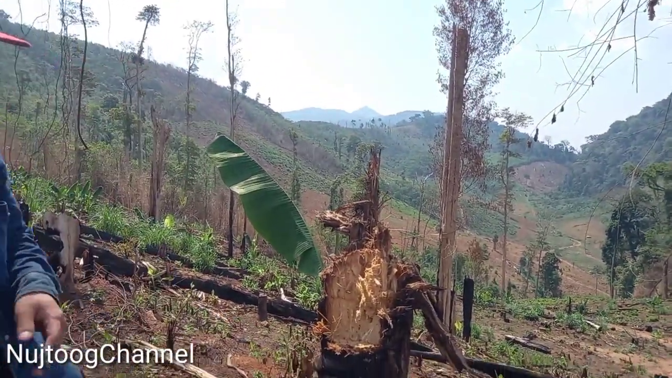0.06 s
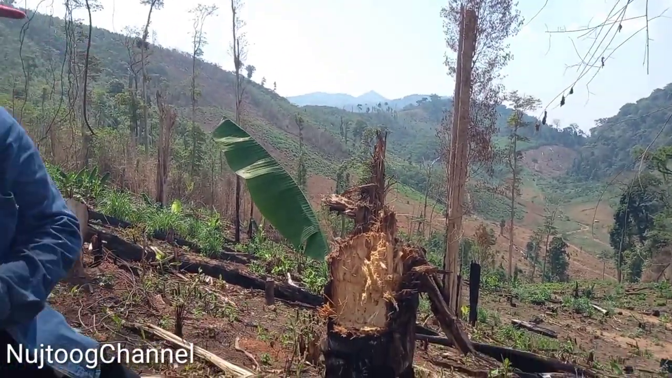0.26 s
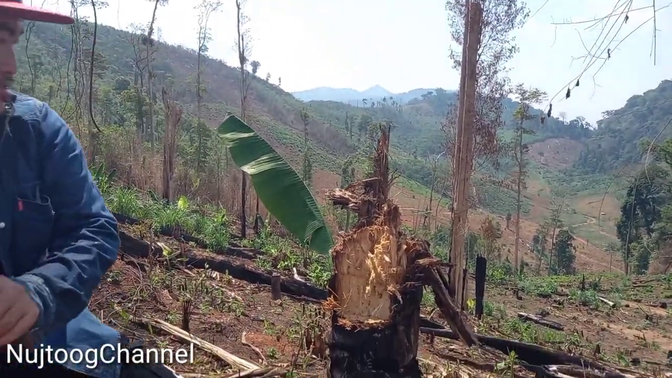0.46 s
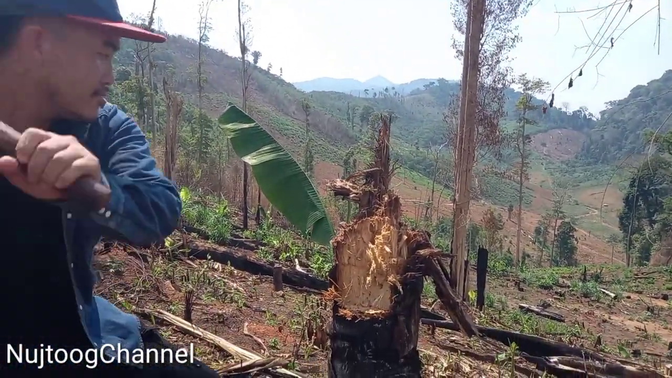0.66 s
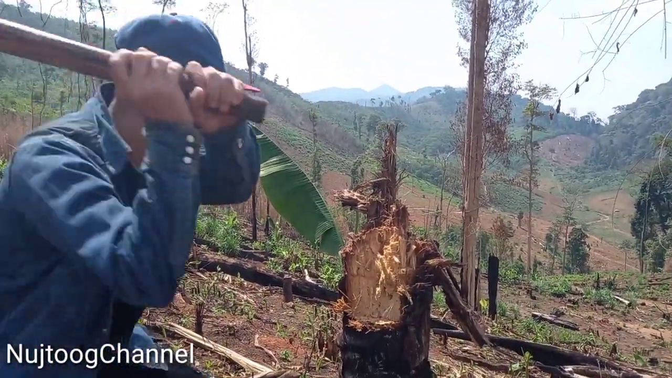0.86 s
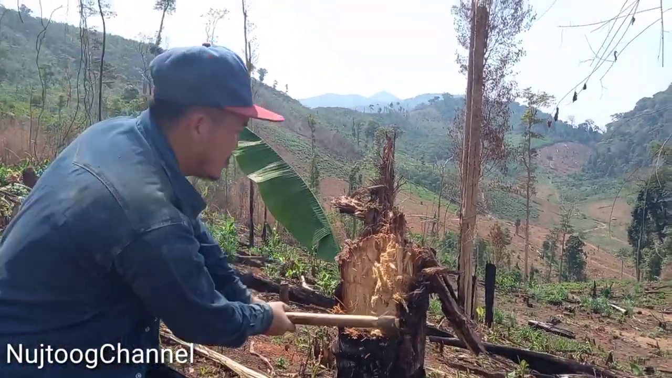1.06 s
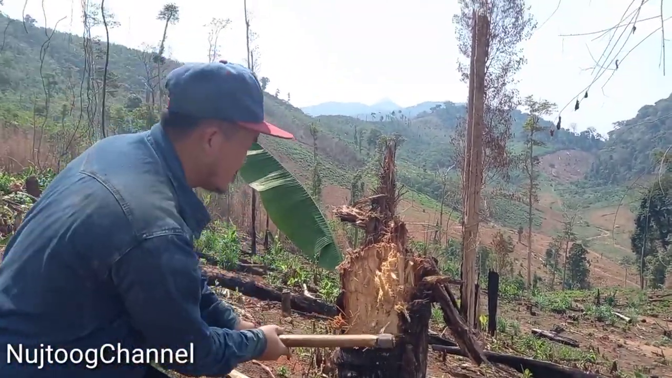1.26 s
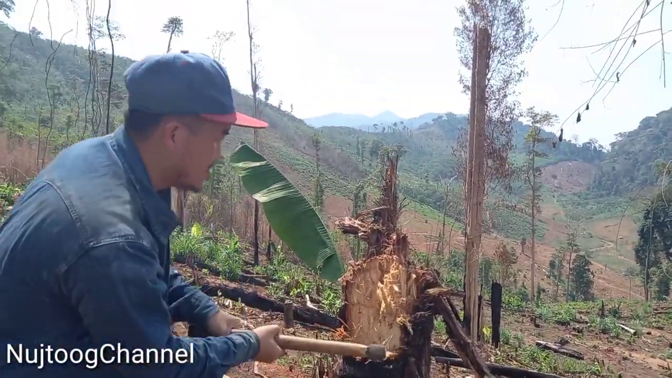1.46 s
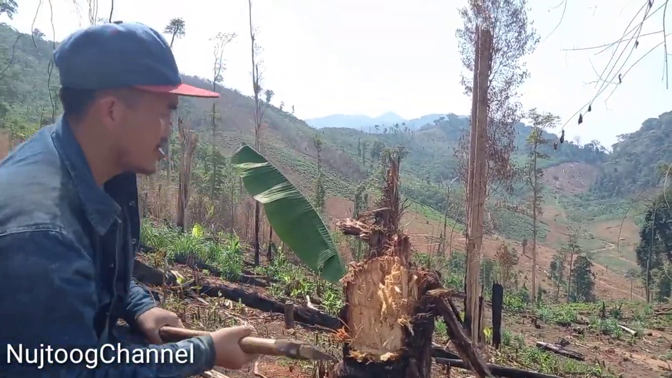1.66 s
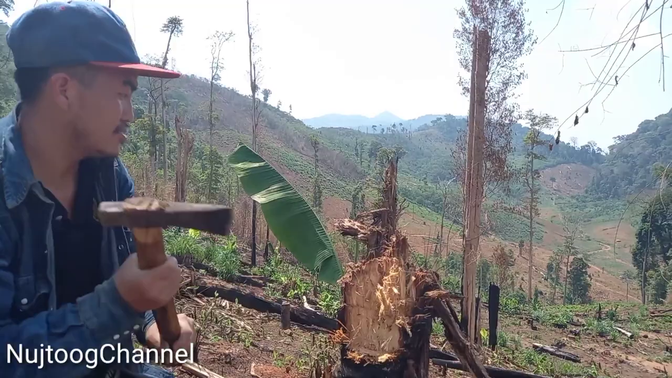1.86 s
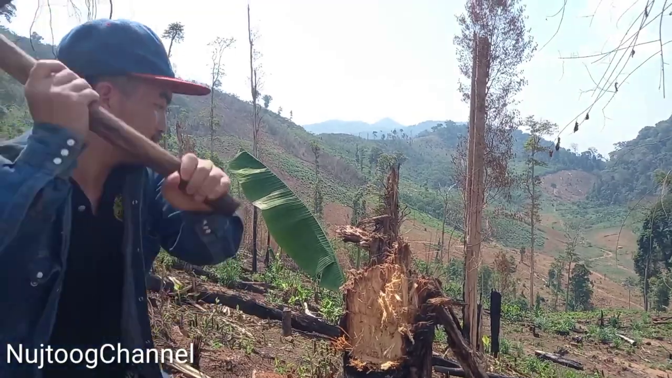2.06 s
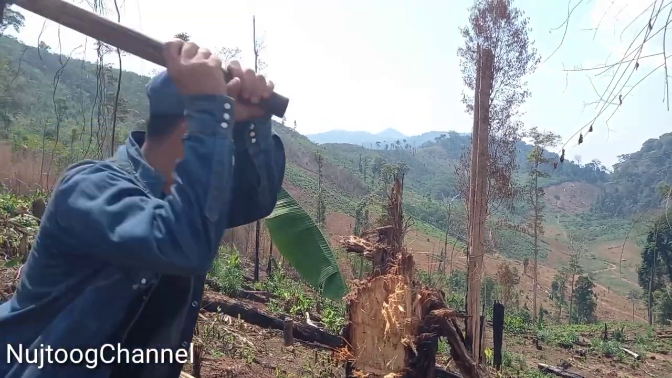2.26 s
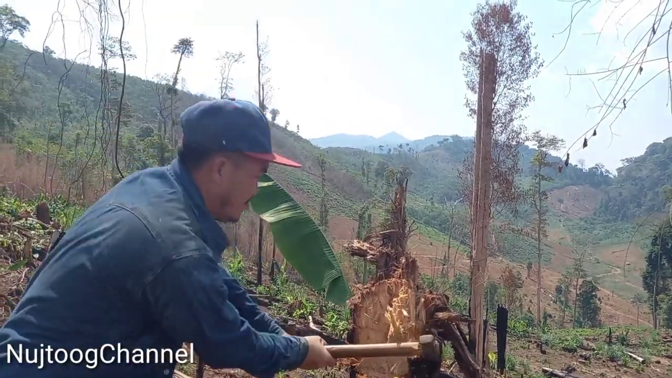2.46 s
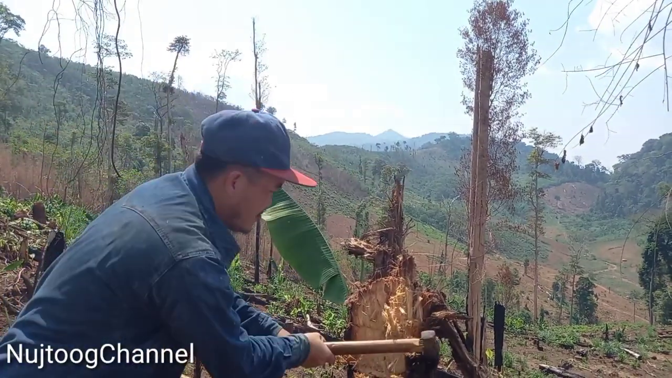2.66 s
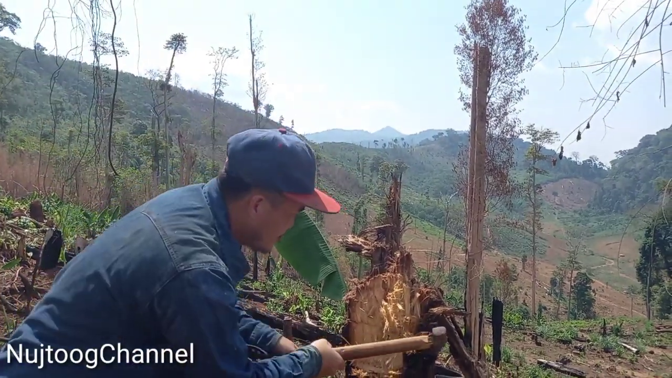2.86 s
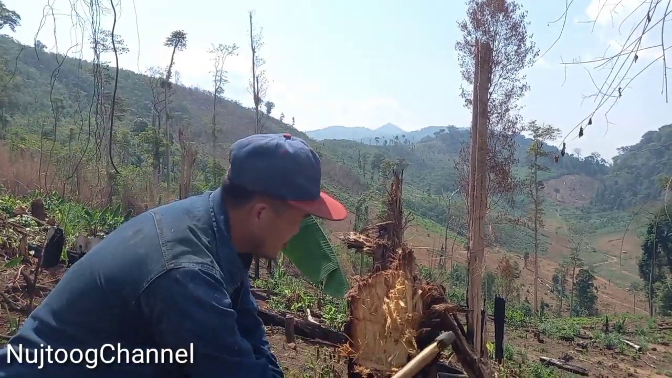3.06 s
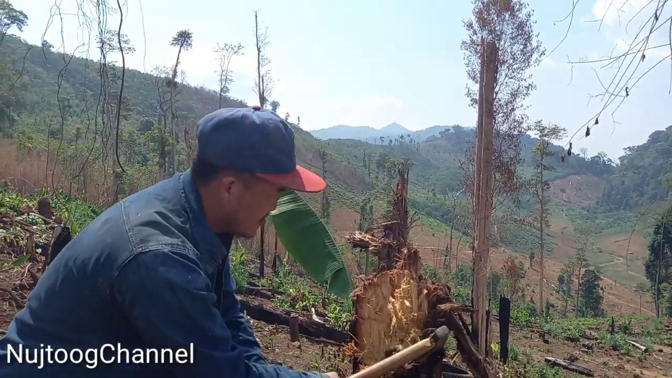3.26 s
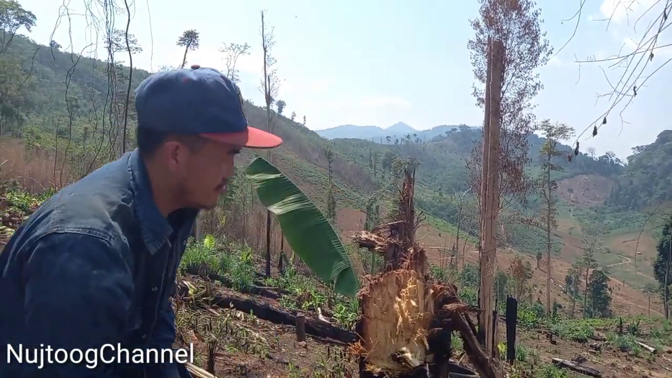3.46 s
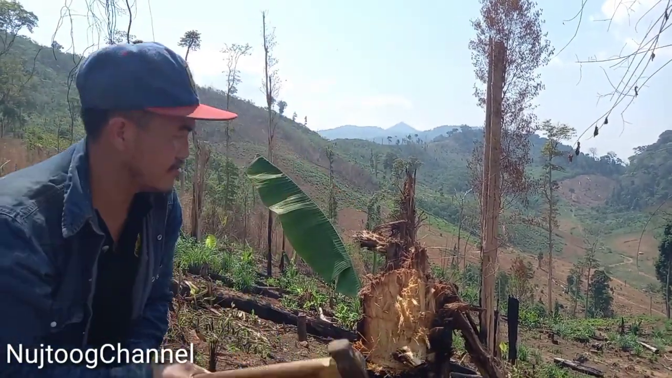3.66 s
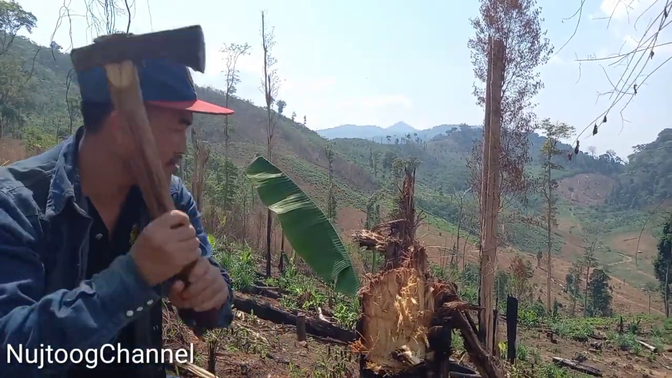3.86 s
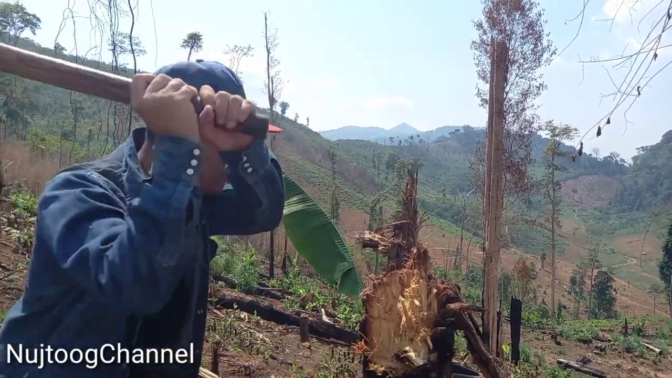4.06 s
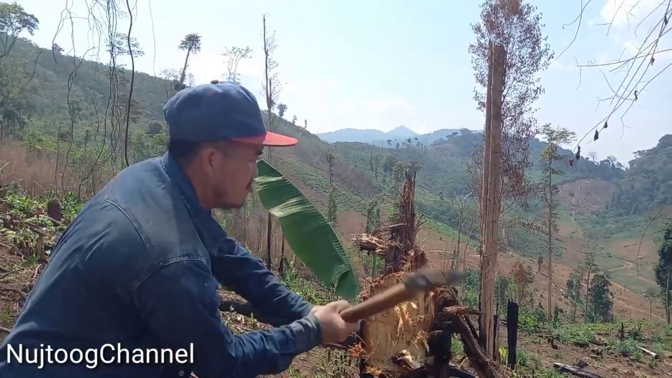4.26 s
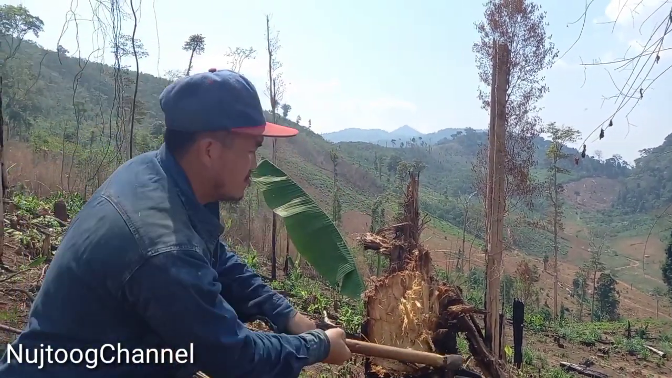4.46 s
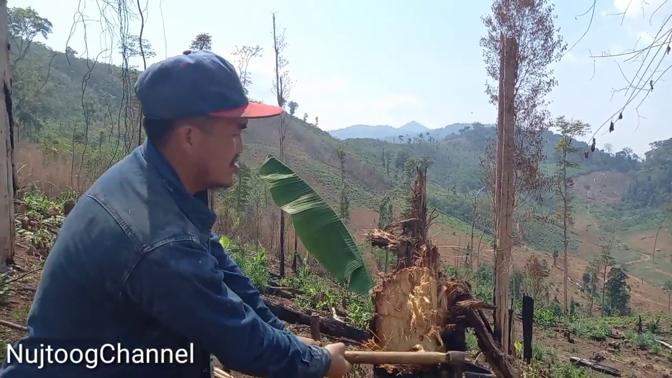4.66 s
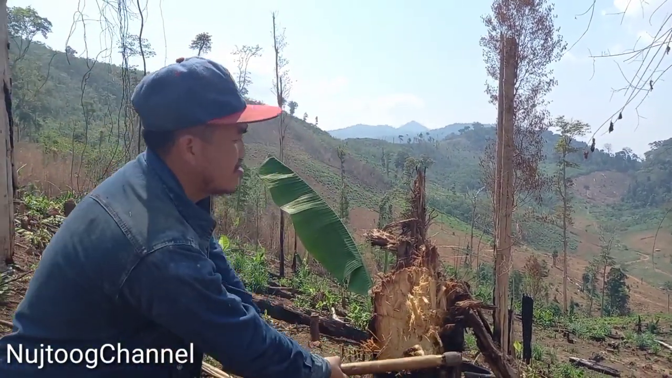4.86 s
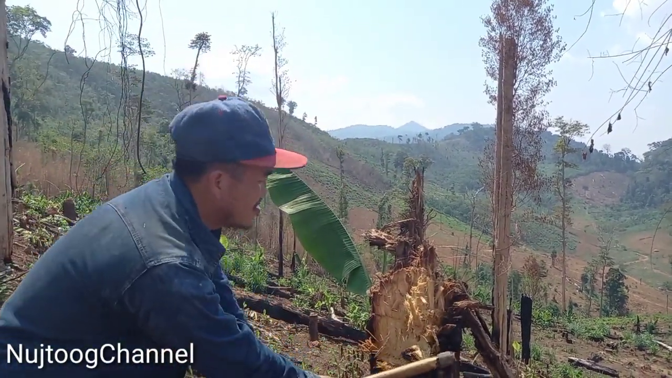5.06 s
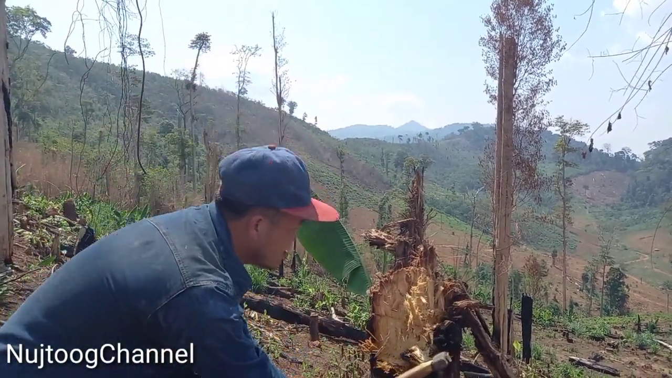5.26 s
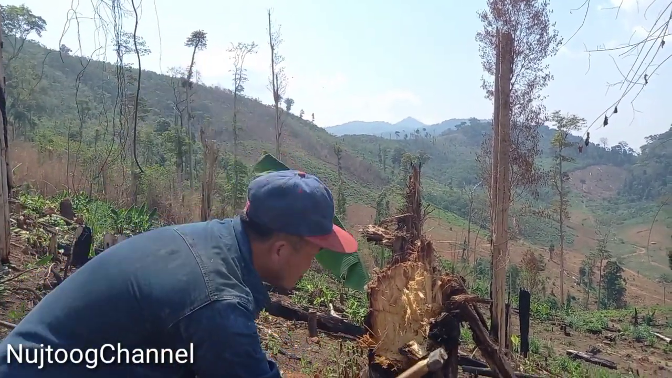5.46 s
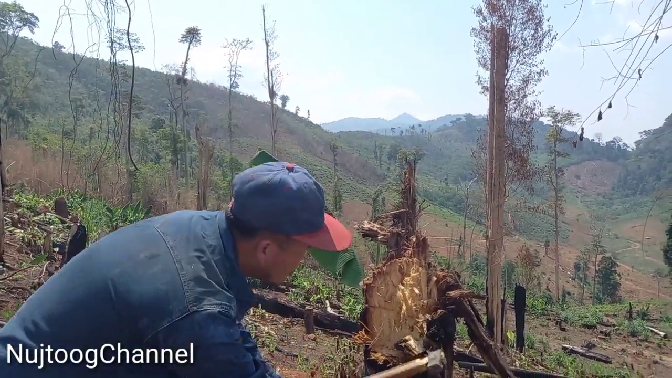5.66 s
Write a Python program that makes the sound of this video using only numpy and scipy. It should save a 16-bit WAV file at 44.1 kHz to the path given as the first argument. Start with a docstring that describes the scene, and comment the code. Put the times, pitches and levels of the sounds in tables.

```python
"""An open hillside: three heavy axe blows into a dead stump, close to a two-port microphone.
Each blow is a burst of crushed fibres shaped by slab resonances, then damped knock and thud modes and noisy crumbs.
Short bursts make splinters, chips, leaf ticks and one bird-like tick; late slips, sent as bending waves, creak.
Filtered noise makes low air, hissing insects, a cicada's phrases and scuffs; falling sine chips make small birds."""
import sys
import numpy as np
from scipy import signal
from scipy.fft import rfft, irfft
from scipy.io import wavfile
from scipy.ndimage import uniform_filter1d

SR = 44100
rng = np.random.default_rng(int(sys.argv[2]) if len(sys.argv) > 2 else 0)


def log_audio(samples):
    """Write samples as a 16-bit WAV file to the path given in sys.argv[1]."""
    # one column per channel
    frames = np.atleast_2d(samples).T
    # limit to full scale, then quantise
    limited = np.clip(frames, -1, 1)
    pcm = np.round(limited * 32767).astype(np.int16)
    wavfile.write(sys.argv[1], SR, pcm)


N = 252252
TIME = np.arange(N) / SR

# Colour of the wind and far rumble. Each row: frequency in Hz, relative level in dB.
AIR_COLOUR = [(15, -57), (25, -28), (63, -5), (80, 3), (118, -5.5), (173, -14.5), (276, -14), (583, -21.5),
              (840, -18), (1230, -27), (1600, -25), (2080, -45), (3520, -120)]
AIR_DB = -70.5
# Colour of the insect chorus. Each row: frequency in Hz, relative level in dB.
HISS_COLOUR = [(1100, -32), (1750, -16.5), (2200, -14.5), (2800, -9), (3450, -1.5), (4100, -6.5),
               (4800, -3), (5500, -8), (6700, -7), (7500, -13.5), (9700, -14), (10600, -19.5), (13000, -22),
               (15200, -31), (16000, -42.5)]
# Narrow bands in the chorus. Each row: centre in Hz, half-width in Hz, relative level in dB.
HISS_BANDS = [(1695, 25, -7.5), (3420, 230, -3)]
# Swell of the chorus. Each row: time in seconds, level in dB before its patches and side lean.
HISS_LEVEL = [(0, -59), (2.6, -59.5), (4.1, -61.5), (5.7, -60)]
# Swell of a far insect's buzz. Each row: time in seconds, level in dB.
INSECT_LEVEL = [(0, -81.5), (3.2, -73.5), (3.7, -75.5), (4.6, -74.5), (4.85, -76), (5.72, -69.5)]
# Likeness of near sounds at the two ports. Each row: frequency in Hz, likeness from -1 to 1.
NEAR_LIKENESS = [(100, 0.88), (1000, 0.92), (2000, 1), (4000, 0.85), (7000, 1), (15000, 0.48)]
# Likeness of the air, chorus and cicada at the two ports. Each row: frequency in Hz, likeness from -1 to 1.
AIR_LIKENESS = [(80, 0.1), (900, 0.4), (2200, 0.1), (3500, -0.5), (4700, 0.1), (6000, -0.2), (9000, 0.1)]
# Likeness of crumbs and scattered sound at the two ports. Each row: frequency in Hz, likeness from -1 to 1.
SCATTER_LIKENESS = [(100, 0.95), (500, 0.63), (1000, 0.6), (2000, 0.94), (4000, .1), (15000, 0.11)]
# Near sounds lag at the left port. Each row: frequency in Hz, lag in radians.
PORT_LAG = [(100, 0), (1400, 0.63), (2400, 1.81), (3500, 1.06), (6000, 2), (9000, 1.5), (15000, 3.5)]
# Near bursts are shaded at the left port. Each row: frequency in Hz, left over right in dB.
PORT_SHADE = [(100, -1), (400, -0.94), (2000, 0), (4500, 0), (7200, -2.5), (9000, -1.5), (13000, -2)]

# Double chips of the nearer bird. Each row: time of the first chip in seconds, mean envelope in dB, mid pitch in Hz.
NEAR_CHIPS = [(2.24, -58, 5800), (3.605, -61, 6100)]
CHIP_GAP_S = .0385
# Brief single chips from further off; the spreads reach as far up as down.
FAR_CHIP_DB, FAR_CHIP_SPREAD_DB, FAR_CHIP_HZ, FAR_CHIP_SPREAD_HZ = -65.5, 4, 6310, 520
FAR_CHIPS_PER_S, FAR_CHIP_S = 36, .006
# Scuffs of feet and sleeves. Each row: middle in seconds, peak level in dB, Gaussian length in seconds, centre in Hz.
SCUFFS = [(.06, -58.5, 0.0087, 1530), (0.596, -68, 0.058, 880), (1.632, -74, 0.052, 835),
          (1.77, -64.5, .035, 1400), (2.821, -61.5, 0.018, 1010), (2.991, -58.5, 0.009, 2780),
          (3.079, -56.5, 0.025, 1700), (3.298, -62, 0.022, 2080), (3.53, -69, 0.055, 940)]

# Splinters snapping, chips landing, and one faint bird-like tick at 1.7255 s.
# Each row: time in seconds, level in dB, length in seconds, brightness in dB per octave, ring in Hz.
SNAPS_AND_TICK = [(1.189, -42, 0.0009, 4, 5070), (1.7255, -51.5, 0.0005, 3, 5800),
                  (2.788, -44, 0.00082, 1.5, 4650), (2.808, -39.5, .0009, 2, 4900),
                  (2.8565, -37, 0.00042, 1, 1900), (2.86, -41.5, 0.0057, -1, 1760),
                  (3.0488, -36.5, 0.0014, 0, 1650), (3.599, -48, 0.00044, 4, 6330)]
# Shared colour of all these short bursts. Each row: frequency in Hz, relative level in dB.
SNAP_COLOUR = [(200, -17), (900, -10), (1700, -2), (3000, 2.5), (5500, 1.5), (7000, 1), (8000, -8),
               (12500, -5.5), (16000, -13)]
SNAP_RING_DB, SNAP_RING_WIDTH_HZ = 9, 300  # each burst's own resonance
# Fibres tear in a quick run as the blade is levered out.
TEAR_START_S, TEAR_GAP_S, TEAR_LENGTH_S, TEAR_HZ = 2.8165, .013, .0013, 5200
TEAR_DB, TEAR_FADE_DB_PER_S = -43, 150
# Small chips land after each blow, the later the fainter; the tilt is per octave.
DEBRIS_FROM_S, DEBRIS_TO_S, DEBRIS_TILT_DB, DEBRIS_HZ = .06, 0.22, 8, 6030
DEBRIS_DB, DEBRIS_FADE_DB_PER_S = -45.5, 70
# Dry leaves and twigs underfoot: the faintest tick, the range above it, and the tilt per octave.
FAINTEST_TICK_DB, TICK_RANGE_DB, TICK_TILT_DB, TICKS_PER_S = -66.5, 8.5, -3, 9.7

# Colour of the cicada's rasp. Each row: frequency in Hz, relative level in dB.
RASP_COLOUR = [(2400, -15.5), (3000, -0.5), (3600, -3), (3950, 7.5), (4350, -0.5), (5000, 2.5),
               (6700, -3.5), (7500, -8), (10000, -5), (11800, -2.5), (12500, -4.5), (13200, -5),
               (15000, -9.5), (15800, -18.5)]
# Colour of the cicada's lower buzz. Each row: frequency in Hz, relative level in dB.
LOW_BUZZ_COLOUR = [(1000, -32.5), (1550, -16.5), (1750, -5), (2300, 2), (2800, 5), (3500, -18), (6000, -51)]
# Cicada phrases, about one every 0.6 s.
# Each row: start in seconds, length in seconds, then rasp and low buzz in dB before growth and side lean.
PHRASES = [(0.499, 0.36, -62.5, -68.5), (1.136, 0.45, -60.5, -66.5), (1.735, 0.47, -60.5, -68.5),
           (2.336, 0.41, -58.5, -69), (2.894, 0.454, -60.5, -64), (3.52, 0.45, -61.5, -73),
           (4.12, .43, -62, -73), (4.707, 0.37, -63, -66.5), (5.273, .32, -66.5, -94)]
PHRASE_ATTACK_S, PHRASE_RELEASE_S, PHRASE_GROWTH_DB = 0.034, 0.03, 0.5

# Axe blows. Each row: time in seconds, crush level in dB, crush length in seconds, brightness in dB per octave,
# thud trim in dB, tail trim in dB, crush left over right in dB.
BLOWS = [(1.07, -11, 0.00092, 2, 1, 2, 1.5), (2.488, -11, 0.0014, -0.1, -2, 0, -2),
         (4.3454, -10.5, 0.0012, 2.16, -0.5, 0, -1)]
# Resonances of the blade and the slab that it splits off, one list a blow.
# Each row: frequency in Hz, width in Hz, relative level in dB before the blow's brightness.
SLABS = [
    [(727, 130, 6), (1260, 47, -9.5), (1440, 43, -9.5), (2230, 120, 0), (3580, 130, -2), (4050, 160, -5),
     (5140, 310, -2), (6020, 140, -5), (6410, 410, -1.5), (9030, 270, -12.5), (11620, 200, -14.5)],
    [(758.4, 100, 6.5), (1161.6, 120, -10), (1938, 760, -7.5), (2460, 320, -2), (2933, 330, -10),
     (3640, 130, -6.5), (4460, 260, -9.5), (5350, 590, -11), (6804, 200, -10.5), (11100, 450, -13.5),
     (13400, 230, -16)],
    [(753, 69, 6.5), (1460, 187, 7.5), (1656, 110, 6.5), (2080, 230, -8), (2300, 190, -1.5),
     (3160, 150, -9), (3856, 290, -7), (4730, 93, -6), (5764, 200, -10), (6570, 520, -7.5),
     (8420, 660, -17), (12290, 160, -18)],
]
# Colour of the crushing fibres. Each row: frequency in Hz, relative level in dB before the blow's brightness.
CRUSH_COLOUR = [(150, -30.5), (400, -22), (1000, -22.5), (2500, -16.5), (6800, -17), (7700, -23),
                (12000, -22.5), (14500, -25.5), (16500, -39)]
# The stump rocking on its roots. Each row: frequency in Hz, level in dB before the low cut and the blow's trim,
# 60 dB decay in seconds, delay in seconds, rise in seconds.
THUD_MODES = [(84, -10, 0.14, 0.0018, 0.0034), (131.6, -7.5, .085, .003, 0.011)]
# Trunk modes; each blow lands on another spot. Each row: frequency in Hz, 60 dB decay in seconds, delay in seconds,
# rise in seconds, then level in dB for the first, second and third blow, before the side lean.
KNOCK_MODES = [(238, 0.055, 0.0026, 0.0044, -10.5, -12, -13), (349, 0.035, 0.0036, 0.0068, -10, -11, -11),
               (437, 0.034, .002, 0.0033, -11, -13.5, -10.5), (546.9, .04, 0.0029, 0.012, -28.5, -19, -17),
               (641, 0.056, .003, .004, -15.5, -20.5, -38), (774, 0.082, .003, 0.0015, -26, -40, -31.5),
               (1004, 0.052, 0.0038, 0.0012, -19, -17.5, -36.5),
               (1086, 0.041, 0.0016, 0.0034, -22.5, -28, -14.5)]
# Colour of the crumbling wood. Each row: frequency in Hz, relative level in dB.
CRUMBLE_COLOUR = [(100, -19), (300, -2), (900, 0), (1500, -3), (2500, -4.5), (4500, -9), (6800, -14),
                  (7800, -24.5), (13000, -22), (16000, -29.5)]
# Colour of the sound scattered by ground and brush. Each row: frequency in Hz, relative level in dB.
SCATTER_COLOUR = [(40, -5.5), (85, 16.5), (180, 5), (400, 0.5), (800, 2), (1400, -7.5), (2500, -6),
                  (4500, -8), (6800, -8), (7800, -20), (13000, -13.5), (16000, -25)]
# Decay of that scatter. Each row: frequency in Hz, 60 dB decay in seconds.
SCATTER_T60 = [(80, 0.34), (300, 0.31), (900, 0.3), (3000, 0.37), (12000, 0.32)]

# Runs of stick and slip in the creaking wood. Each row: start in seconds, slips, first gap in seconds,
# growth factor of the gap per slip, full level in dB, full brightness in dB per octave.
CREAK_RUNS = [(4.6544, 5, .0155, 1.0, -60.5, -0.1), (4.8244, 4, .0524, 1.11, -58.5, 2)]
# Colour of one slip. Each row: frequency in Hz, relative level in dB.
SLIP_COLOUR = [(130, -23), (300, -0.5), (480, 1), (640, -8.5), (775, 8), (920, -2.5), (1150, -16),
               (1600, 1), (2300, -3), (2900, -9), (4500, -15), (9000, -34)]
# A run starts soft and dull; these offsets die away over the given number of slips.
FIRST_SLIP_DB, FIRST_SLIP_TILT_DB, GRIP_SLIPS = -5.5, -1.5, 0.75
SLIP_UNEVEN_DB, SLIP_UNEVEN_PITCH = 1.5, .08  # no two slips are quite alike (dB, share of pitch)
EDGE_HZ = 16200


def amp(db):
    """Decibels to gain."""
    return 10 ** (np.asarray(db) / 20)


def unit(x):
    """Scales to rms 1."""
    return x / np.sqrt(np.mean(x ** 2) + 1e-20)


def read(points, hz):
    """Reads a table along a log-frequency axis."""
    f, value = np.transpose(points)
    return np.interp(np.log(hz + 1), np.log(f + 1), value)


def tilt(db, hz):
    """A slope in dB per octave, pivoting near 4 kHz."""
    return amp(db * np.log2((hz + 100) / 4000))


def bins(size):
    """Frequencies of a spectrum of this many samples."""
    return np.fft.rfftfreq(size, 1 / SR)


def add(mix, s, sound):
    """Lays a sound into the mix at time s, which may lie before zero."""
    start = round(s * SR)
    sound = sound[..., max(-start, 0):]
    part = mix[:, max(start, 0):][:, :sound.shape[-1]]
    part += sound[..., :part.shape[1]]


def pair(z, likeness, hz):
    """Blends two unrelated spectra into a partly alike left and right."""
    c = np.clip(read(likeness, hz), -1, 1)
    mid = np.sqrt((1 + c) / 2) * z[0]
    side = np.sqrt((1 - c) / 2) * z[1]
    return np.array([mid + side, mid - side])


def noise(gain, likeness, size, grain_db=0):
    """Stereo noise of a given spectrum; grain_db clumps it into crumbs."""
    clumps = np.repeat(rng.standard_normal(size // 32 + 1), 32)[:size]
    z = rfft(rng.standard_normal((2, size)) * amp(grain_db * clumps))
    return unit(irfft(pair(z, likeness, bins(size)) * gain, size))


def causal(gain):
    """Gives a magnitude spectrum the phase of a body that rings after it is struck."""
    log_gain = np.log(np.r_[gain, gain[-2:0:-1]] + 1e-5)
    return np.exp(np.conj(signal.hilbert(log_gain)))[:len(gain)]


def fracture(gain, length, size=4096):
    """A volley, as of breaking fibres, swells and dies around sample size / 8, and rings a body causally."""
    t, hz = (np.arange(size) - size // 8) / SR, bins(size)
    swell = np.exp(-np.sqrt((t / length) ** 2 + 1))
    z = pair(rfft(rng.standard_normal((2, size)) * swell), NEAR_LIKENESS, hz)
    z /= np.sqrt(uniform_filter1d((abs(z) ** 2).mean(0), size=29))  # the volley drives all bands alike
    z[0] *= np.exp(-1j * read(PORT_LAG, hz))
    entry = np.clip(1.3 + .33 * t / length, 0, 1) ** 2  # silence until contact
    z = rfft(irfft(z) * entry) * amp(np.outer([.5, -.5], read(PORT_SHADE, hz)))
    return unit(irfft(z * causal(gain))) * np.sqrt(.004 * SR / size)  # level as if spread over 4 ms


def hillside(insect_hz=4700, insect_width=55, patchy_db=2.08):
    """Low air, the patchy hiss of an insect chorus, and one narrow noise band as an insect buzz."""
    hz = bins(N)
    colour = amp(read(HISS_COLOUR, hz))
    colour = colour + sum(amp(db) / (1 + ((hz - f) / width) ** 2) for f, width, db in HISS_BANDS)
    f, t, z = signal.stft(noise(colour, AIR_LIKENESS, N, grain_db=1.6), SR, nperseg=512)
    # random level patches, smoothed over frequency and then time
    patches = uniform_filter1d(rng.standard_normal(z.shape[1:]), size=4, axis=0)
    patches = unit(uniform_filter1d(patches, size=9, axis=1))
    level_db = np.interp(t, *np.transpose(HISS_LEVEL)) + patchy_db * patches
    hiss = signal.istft(z * amp(level_db), SR)[1][:, :N]
    buzz = noise(1 / (1 + ((hz - insect_hz) / insect_width) ** 2), NEAR_LIKENESS, N)
    buzz = buzz * amp(np.interp(TIME, *np.transpose(INSECT_LEVEL)))
    air = amp(AIR_DB) * noise(amp(read(AIR_COLOUR, hz)), AIR_LIKENESS, N)
    return air + hiss * amp([[-.6], [.6]]) + buzz


def bird(near_s=0.0081, fall=0.3):
    """Faint, tick-like falling sines: double chips, and single ones at random from further off."""
    out = np.zeros((2, N))
    near = [(s + delay, db, hz, near_s) for s, db, hz in NEAR_CHIPS for delay in (0, CHIP_GAP_S)]
    far = []
    for at, force, pitch in rng.random((int(FAR_CHIPS_PER_S * N / SR), 3)):
        db = FAR_CHIP_DB + FAR_CHIP_SPREAD_DB * (2 * force - 1)
        hz = FAR_CHIP_HZ + FAR_CHIP_SPREAD_HZ * (2 * pitch - 1)
        far.append((at * N / SR, db, hz, FAR_CHIP_S))
    for s, db, hz, length in near + far:
        t = np.arange(0, length, 1 / SR)
        turns = np.cumsum(hz * (1 + fall * (.5 - t / length))) / SR
        tone = np.sin(2 * np.pi * (turns + rng.random((2, 1))))  # each port has its own phase
        add(out, s - length / 2, amp(db) * 2 * np.hanning(len(t)) * tone)
    return out


def scuffs(size=16384):
    """Short gritty rubs on dry soil and cloth: clumped noise in a broad band under a Gaussian swell."""
    out, hz, t = np.zeros((2, N)), bins(size), (np.arange(size) - size // 2) / SR
    for s, db, length, centre_hz in SCUFFS:
        colour = 1 / (1 + (np.log2((hz + 1) / centre_hz) / 0.36) ** 2) ** 0.4
        grit = noise(colour, NEAR_LIKENESS, size, grain_db=4)
        add(out, s + t[0], amp(db) * grit * np.exp(-(t / length) ** 2 / 2))
    return out


def splinters_and_ticks(size=4096, tear_count=3, debris_count=2):
    """Short ringing bursts: leaf-litter ticks, snaps, tearing fibres, landing chips and one bird-like tick."""
    out, hz = np.zeros((2, N)), bins(size)
    litter = []
    for at, force, small in rng.random((int(TICKS_PER_S * N / SR), 3)):
        db = FAINTEST_TICK_DB + TICK_RANGE_DB * force
        litter.append((at * N / SR, db, .0005, TICK_TILT_DB, 2500 + 4000 * small))
    tear = [(TEAR_START_S + age, TEAR_DB - TEAR_FADE_DB_PER_S * age, TEAR_LENGTH_S, 0, TEAR_HZ)
            for age in TEAR_GAP_S * np.arange(tear_count)]
    debris = []
    for blow in BLOWS:
        for age in (DEBRIS_TO_S - DEBRIS_FROM_S) * rng.random(debris_count):
            db = DEBRIS_DB - DEBRIS_FADE_DB_PER_S * age
            debris.append((blow[0] + DEBRIS_FROM_S + age, db, .0006, DEBRIS_TILT_DB, DEBRIS_HZ))
    for s, db, length, tilt_db, ring_hz in SNAPS_AND_TICK + tear + debris + litter:
        resonance_db = SNAP_RING_DB / (1 + ((hz - ring_hz) / SNAP_RING_WIDTH_HZ) ** 2)
        gain = amp(read(SNAP_COLOUR, hz) + resonance_db) * tilt(tilt_db, hz)
        add(out, s - size / 8 / SR, amp(db) * fracture(gain, length))
    return out


def cicada():
    """A bright rasp and a lower buzz, switched on and off together in phrases that grow a little."""
    rasp, buzz = (noise(amp(read(colour, bins(N))), AIR_LIKENESS, N, grain_db=2.3)
                  for colour in (RASP_COLOUR, LOW_BUZZ_COLOUR))
    out = np.zeros((2, N))
    for s, length, rasp_db, buzz_db in PHRASES:
        age = np.clip(TIME - s, 0, length + PHRASE_RELEASE_S)
        attack, release = age / PHRASE_ATTACK_S, 1 - (age - length) / PHRASE_RELEASE_S
        gate = np.clip(np.minimum(attack, release), 0, 1)
        growth = amp(PHRASE_GROWTH_DB * (age / length - 2.0))  # from -1 dB up to about -0.5 dB
        out += gate * growth * (amp(rasp_db) * rasp + amp(buzz_db) * buzz)
    return out * amp([[-.6], [.6]])


def ring(modes, size=26460):
    """Damped modes of alternating sign, each starting after its own delay and swelling over its own rise."""
    t, out = np.arange(size) / SR, np.zeros(size)
    for k, (hz, db, t60, delay, rise) in enumerate(modes):
        age = np.maximum(t - delay, 0)
        envelope = amp(db - 60 * age / t60) * (1 - np.exp(-(age / rise) ** 2))
        out -= (-1) ** k * envelope * np.sin(2 * np.pi * hz * age)
    return out


def tail(crumble_db=-20, crumble_t60=0.052, scatter_db=-35, rise=0.001, size=26460):
    """Rotten wood crumbles briefly; ground and brush scatter the blow for longer."""
    t, hz = np.arange(size) / SR, bins(size)
    crumbs, brush = (noise(amp(read(colour, hz)), SCATTER_LIKENESS, size, grain_db=2.5)
                     for colour in (CRUMBLE_COLOUR, SCATTER_COLOUR))
    f, age, z = signal.stft(brush, SR, nperseg=256)
    decay_db = scatter_db - 60 * age / read(SCATTER_T60, f)[:, None]
    scatter = signal.istft(z * amp(decay_db), SR)[1][:, :size]
    return (crumbs * amp(crumble_db - 60 * t / crumble_t60) + scatter) * (1 - np.exp(-t / rise))


def axe(radiate_hz=52, size=4096):
    """The blade crushes in and rings the slab; then the trunk knocks and the roots thud."""
    out, hz = np.zeros((2, N)), bins(size)
    mode_hz, t60, delay, rise, *spots = np.transpose(KNOCK_MODES)
    low_cut = signal.butter(2, radiate_hz, "high", fs=SR, output="sos")  # a small stump radiates little deep bass
    thud = signal.sosfilt(low_cut, ring(THUD_MODES))
    for blow, slab, spot_db in zip(BLOWS, SLABS, spots):
        s, crush_db, length, tilt_db, thud_db, tail_db, pan_db = blow
        power = amp(read(CRUSH_COLOUR, hz)) ** 2
        for f, width, db in slab:
            power = power + amp(db) ** 2 / (1 + ((hz - f) / (0.79 * width)) ** 2) ** 2
        crack = fracture(np.sqrt(power) * tilt(tilt_db, hz), length)
        add(out, s - size / 8 / SR, amp(crush_db) * amp([[pan_db / 2], [-pan_db / 2]]) * crack)
        knock = ring(zip(mode_hz, spot_db, t60, delay, rise))
        body = (knock + amp(tail_db) * tail()) * amp([[-.7], [.7]])
        add(out, s, body + amp(thud_db) * thud)
    return out


def slips():
    """Yields each slip's time, dB and brightness: force grows as the wood grips, gaps widen if growth exceeds 1."""
    for s, count, gap, growth, db, tilt_db in CREAK_RUNS:
        for k in range(round(count)):
            slack = np.exp(-k / GRIP_SLIPS)
            yield s, db + FIRST_SLIP_DB * slack, tilt_db + FIRST_SLIP_TILT_DB * slack
            s += gap * growth ** k


def creak(dispersion=0.1136, echo=0.5, echo_delay=0.00392, echo_hz=1300, size=4096):
    """Each slip sends a bending wave along the wood, treble first; a duller wave returns from the far end."""
    out, hz = np.zeros((2, N)), bins(size)
    phase = 4 * np.pi * dispersion * np.sqrt(hz)  # the delay in seconds is dispersion / sqrt(Hz)
    lag = np.exp(-1j * read(PORT_LAG, hz))
    for s, db, tilt_db in slips():
        path = rng.uniform(.9, 1.1)  # varies the echo delay
        back = echo / (1 + (hz / echo_hz) ** 4) * np.exp(-2j * np.pi * hz * echo_delay * path)
        force, pitch = rng.uniform(-1, 1, 2)
        colour = amp(read(SLIP_COLOUR, hz * (1 + SLIP_UNEVEN_PITCH * pitch)))
        slip = causal(colour * tilt(tilt_db, hz)) * np.exp(-1j * phase) * (1 + back)
        wave = unit(irfft([slip * lag, slip]))
        # start early, so that the part at 6 kHz arrives on time
        add(out, s - dispersion / np.sqrt(6000), amp(db + SLIP_UNEVEN_DB * force) * wave)
    return out


def scene():
    """All sources at the two ports."""
    return axe() + creak() + hillside() + cicada() + splinters_and_ticks() + scuffs() + bird()


def record(dry):
    """A steep low-pass limits the band at EDGE_HZ."""
    low_pass = signal.firwin(255, EDGE_HZ, window=("kaiser", 9), fs=SR)
    return signal.oaconvolve(dry, low_pass[None], "same")


dry = scene()
out = record(dry)
log_audio(out)
```